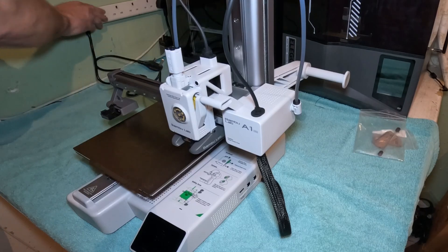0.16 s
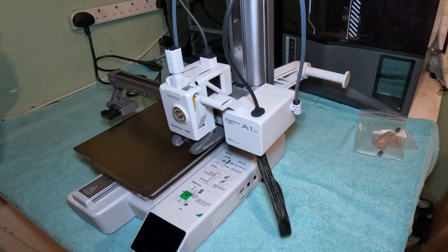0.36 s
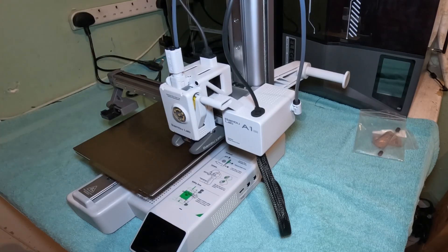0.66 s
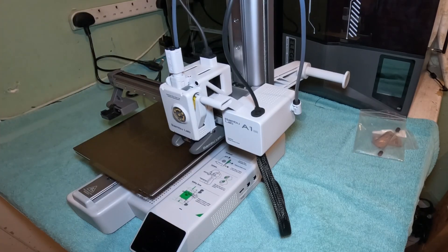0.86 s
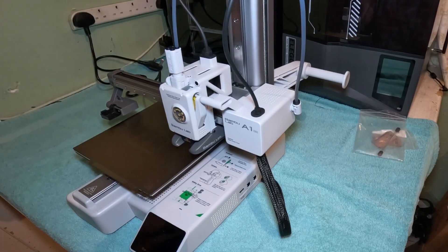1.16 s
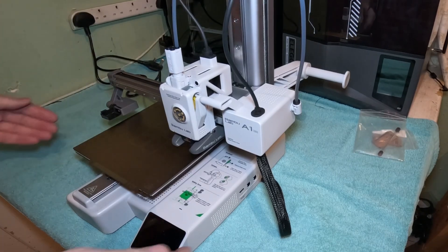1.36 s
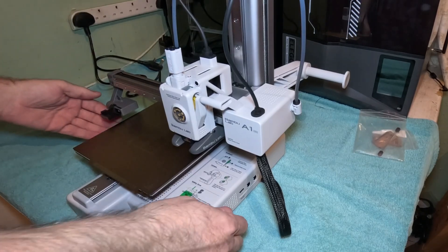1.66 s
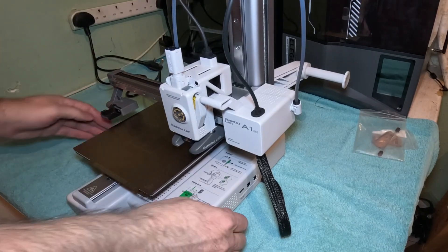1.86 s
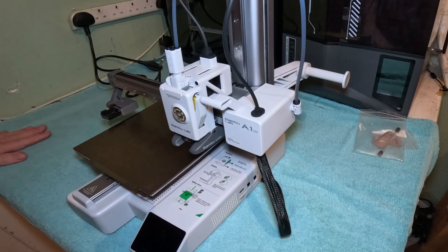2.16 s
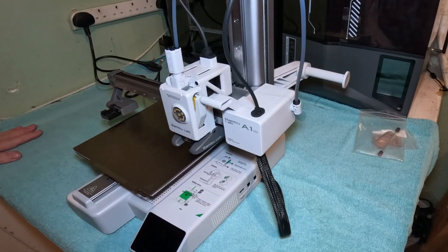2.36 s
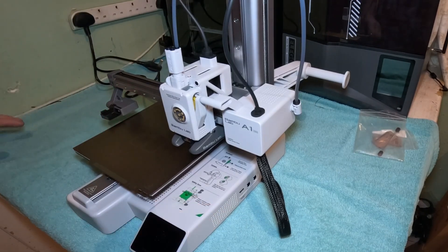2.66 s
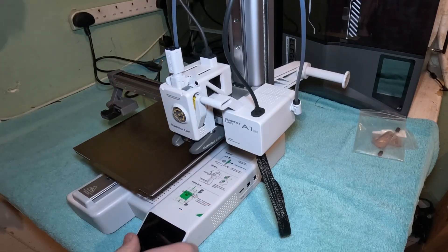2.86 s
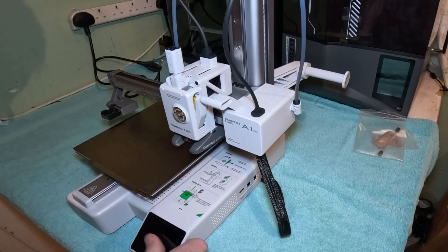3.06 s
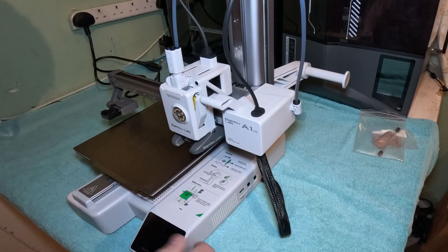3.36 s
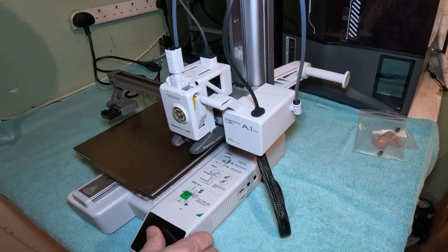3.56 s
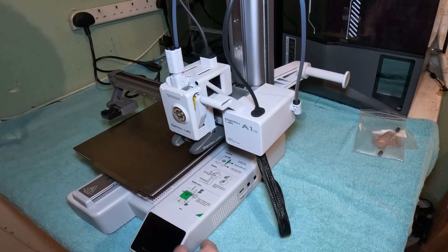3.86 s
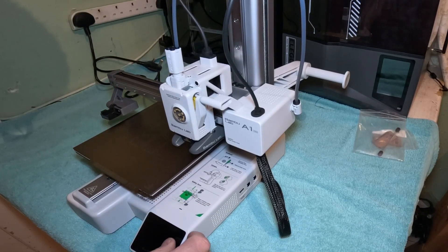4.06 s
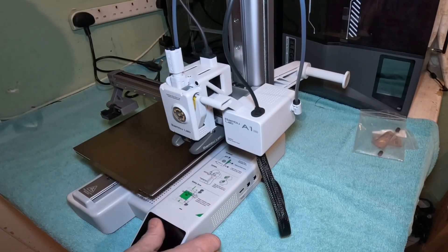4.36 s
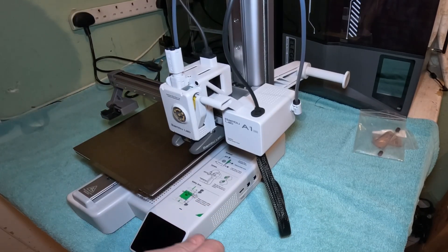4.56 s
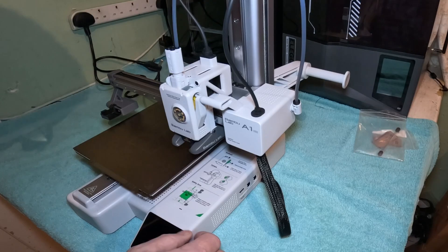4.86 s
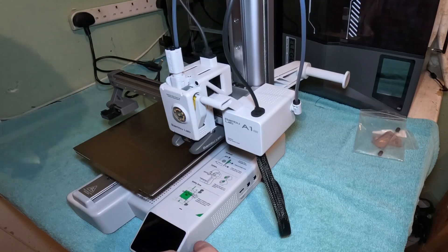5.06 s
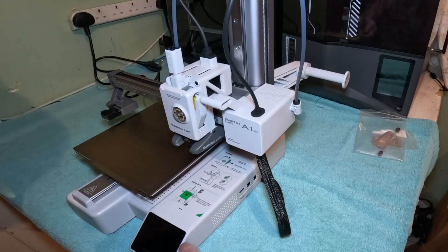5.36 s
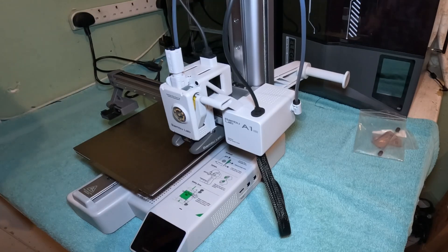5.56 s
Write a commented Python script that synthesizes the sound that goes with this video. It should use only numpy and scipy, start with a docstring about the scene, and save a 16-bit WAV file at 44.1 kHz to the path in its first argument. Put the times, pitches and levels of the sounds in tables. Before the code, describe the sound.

A mains plug snaps sharply into a socket, followed by table knocks, soft cloth rustles and small plastic ticks in a quiet room.

```python
"""A small, quiet workshop room drones faintly. A mains plug snaps into a plastic wall socket,
which rattles while the wall booms. Hands bump the table, making it knock and boom, and brush over
a towel, whose slipping fibres hiss. A cable scrapes along an edge. Fingers rub the plastic
housing of a desktop machine, and its hollow shell hums and ticks under the touch."""
import sys
import numpy as np
from scipy import signal
from scipy.fft import rfft, irfft, next_fast_len
from scipy.io import wavfile
from scipy.ndimage import uniform_filter1d, map_coordinates

SR = 44100
rng = np.random.default_rng(int(sys.argv[2]) if len(sys.argv) > 2 else 0)


def master_out(mix):
    """Clip the mix to full scale and print it as 16-bit PCM to the path in sys.argv[1]."""
    frames = np.transpose(np.atleast_2d(mix))
    ceiling = np.clip(frames, -1, 1)
    pcm = np.round(ceiling * 32767).astype(np.int16)
    wavfile.write(sys.argv[1], SR, pcm)


N = 251644

# A fade_s is the time to fall 60 dB, a rise_s the time to climb 20 dB. Positive pan_db means left.
# the plug's two hits: start_s, level_db, fade_s
PLUG_HITS = [(.0004, -11.5, 0.025), (.0032, -15, 0.011)]
# tone of the socket's rattle, the wall's answer and the room's drone: pitch_hz, level_db
SOCKET_TONE = [(180, -49.5), (300, -15.5), (892, -21.5), (2100, -3), (3400, -9), (5300, 3.5), (7880, -12),
               (12300, -21.5), (15500, -43)]
WALL_TONE = [(35, -58.5), (60, -35), (183, -4), (259, -16), (642, -9), (810, -19), (1260, -10.5),
             (1740, -15), (1910, -8), (2650, -18.5), (3670, -11), (9510, -23), (15500, -55)]
DRONE_TONE = [(41, -37.5), (70, -13.5), (123, -15), (154, 2), (212, -1.5), (304, -9.5), (364, -12),
              (560, -18.5), (920, -25.5), (984, -22.5), (1180, -18.5), (3730, -36.5), (7030, -33.5),
              (15500, -57)]
# how loud the drone is: time_s, level_db
DRONE_LEVEL = [(0.3, -61), (0.57, -64.5), (1.07, -60), (1.59, -61.5), (5.01, -62), (5.55, -59.5),
               (5.71, -58.5)]
# where the drone sits: pitch_hz, pan_db
DRONE_PAN = [(60, -1.5), (240, -2.5), (950, -7), (3770, 2), (15000, 4.5)]
# jolts of the table: full_at_s, level_db
TABLE_JOLTS = [(.11, -50), (.9, -61), (1.53, -61), (2.12, -67), (2.5, -70), (3.13, -61), (3.7, -63),
               (4.2, -72), (4.62, -66), (5.1, -63), (5.55, -70)]
# bumps on the table: start_s, knock_db, boom_over_knock_db, boom_hz, clack_over_knock_db
TABLE_BUMPS = [(.148, -46, -12, 323, 1), (.242, -55, -2, 240, -15), (.849, -72, 13, 240, -26),
               (1.057, -28, -16.5, 187, -25), (1.286, -50.5, 0, 220, -31), (1.51, -58, 6, 300, -20),
               (2.225, -65, 10, 170, -12), (2.521, -52, 12, 195, -20), (4.03, -75, 14, 300, -26),
               (5.0, -70.5, 13, 300, -17.5), (5.534, -40.5, -8, 300, -11), (5.634, -63, 8.5, 270, -28)]
# how the table's board knocks and its top booms: pitch_hz, width_hz, level_db
KNOCK_RINGS = [(500, 270, 3.5), (620, 120, 7.5), (972, 410, 4), (1350, 1030, -10.5)]
BOOM_RINGS = [(173, 27, -1.5), (248, 27.5, -2.5), (300, 195, -5)]
# the hands move from the left to the front and back: time_s, pan_db
HAND_PAN = [(0, 3.5), (1.9, 3), (2.2, 1.3), (3, 0.5), (5.3, 1), (5.6, 3)]
# skin on cloth, and (at 1.058 s) the short hiss of the loudest table knock:
# full_at_s, rise_s, hold_s, hiss_db, drift_db, dull_over_hiss_db, fine_over_hiss_db
HISSES = [(.228, .018, .005, -67.5, 0, 12.5, -23), (.392, .04, .005, -63, 0, 6.5, -21),
          (.61, .16, .2, -69, -9, 2.5, -8), (1.04, .5, .02, -71, 0, 6, -4),
          (1.058, .005, .05, -60, -13, 3, -19), (1.2, .1, .3, -82, -2, -2, -2),
          (1.56, .15, .18, -85, 1, 12, -5), (1.79, .06, .12, -74, -3, 8, -13),
          (1.942, .05, .003, -72.5, 0, -2, -5), (2.205, .036, .15, -53.5, 0, -2.5, -6),
          (2.47, .06, .05, -55, 3, -3, -9), (2.53, .03, .11, -52, -11, -6, -8),
          (3.036, .05, .1, -68, -1, .5, -4), (3.188, .12, .13, -63.5, 1.5, 1.5, -5),
          (3.315, .03, .11, -65, -14, 1, -4), (3.556, .08, .13, -79, 1, 3.5, -2),
          (3.758, .075, .025, -57, -4, -1.5, -2), (3.8, .03, .11, -63, -8, -1.5, -14),
          (4.08, .01, .005, -82, 0, 5.5, -2), (4.356, .13, .07, -74, -6, -.5, -4),
          (4.49, .11, .005, -73, 0, 7.5, -2), (4.595, .02, .065, -70, 5, -1.5, 1),
          (4.82, .05, .02, -84, 0, 2.5, -2), (4.93, .015, .005, -76, 0, -1.5, 5),
          (5.011, .09, .005, -64.5, 0, 4.5, -8)]
# their main hiss, dull body and fine top: pitch_hz, level_db
HISS_TONE = [(1470, -36), (2500, -7), (3260, -5.5), (5800, 1.5), (7530, 0.5), (10000, -10), (13000, -36.5),
             (22000, -120)]
DULL_TONE = [(500, -29.5), (1000, -1), (2000, -1.5), (3500, -6.5), (6000, -11.5), (10000, -40)]
FINE_TONE = [(7500, -30), (9300, 2), (10300, -6.5), (11500, -10.5), (14500, -19), (15700, -27)]
# ticks of the plastic: start_s, ring_db, pitch_hz, crack_over_ring_db, fade_s
PLASTIC_TICKS = [(.223, -51, 1080, -1, .03), (.479, -54.5, 2380, -17, .045), (2.79, -64, 1050, 3.5, .021),
                 (3.003, -52.5, 1397, -15, .027), (3.094, -37, 1015, -6, .02), (3.137, -34, 890, -26, .011),
                 (3.152, -41, 1410, -7, .052), (3.311, -41.5, 974, -2, .075),
                 (3.475, -50.5, 1370, -12, .024), (3.65, -48, 966, -7, .019), (3.692, -54, 620, -16, .079),
                 (3.757, -50, 980, -17, .082), (3.761, -48.5, 530, -25, .088), (3.8, -47.5, 1450, 1, .026),
                 (4.078, -53, 1383, -10, .036), (4.477, -54, 1400, -10, .03),
                 (4.592, -49.5, 1033, -10, .041), (4.668, -54, 2600, .5, .022),
                 (4.921, -46, 1430, -6, .027), (5.017, -40.5, 975, -6, .021)]
# how loud the cable scrapes: time_s, level_db
SCRAPE_LEVEL = [(0.68, -84), (0.706, -69), (1.024, -66), (1.05, -67.5)]
# how the edge, upper shell, lower shell and base plate ring: pitch_hz, width_hz, level_db
EDGE_RINGS = [(1218, 200, -4), (1990, 150, 1.5), (2700, 320, -9.5)]
UPPER_RINGS = [(1410, 200, 5), (1740, 150, -12.5)]
LOWER_RINGS = [(651.8, 120, -3.5), (926, 380, 4)]
BASE_RINGS = [(312, 41, 1), (540, 140, -1)]
# fingers on the housing: full_at_s, rise_s, hold_s, upper_db, lower_db, base_db
FINGER_RUBS = [(3.004, .006, .06, -61, -74, -73), (3.07, .04, .025, -65, -62, -72),
               (3.145, .006, .02, -52, -53, -60), (3.22, .12, .065, -66, -56, -71),
               (3.318, .07, .005, -55, -54, -69), (3.57, .1, .03, -63, -81, -81),
               (3.7, .03, .025, -69, -66, -65), (3.77, .05, .01, -63, -54, -57),
               (3.81, .05, .003, -55, -64, -78), (4.079, .006, .01, -67, -77, -78),
               (4.34, .2, .03, -65, -74, -80), (4.485, .05, .015, -57, -75, -75),
               (4.594, .02, .09, -65.5, -70, -72), (4.82, .07, .02, -65.5, -83, -88),
               (4.925, .01, .05, -61, -76, -76), (5.0, .08, .02, -52, -57, -61)]
# the room's echo, before each sound shortens it: pitch_hz, fade_s
ROOM_FADE = [(120, 0.35), (500, 0.33), (1500, 0.27), (4000, .26), (12000, 0.21)]
# how alike left and right are in close sounds, drone and echoes: pitch_hz, likeness (0 to 1)
CLOSE_LIKENESS = [(300, 1), (2000, 0.3), (4000, 0.9), (9000, .88), (13000, 0)]
DRONE_LIKENESS = [(60, 0.79), (240, 0.56), (950, 0.19), (3770, 0.36), (15000, 0.45)]
ECHO_LIKENESS = [(250, 0.99), (700, 0.9), (1500, 1), (3500, .5), (7000, 0.8), (13000, .08)]
# the microphone's two openings: pitch_hz, pan_db, left_lead_rad
MIC_PORTS = [(300, -3, 0.27), (1200, 0, -.25), (3500, 0, -0.82), (8000, 0.5, -.15), (10500, 0.5, 0),
             (13000, 3, 0)]


def amp(db):
    """Turn decibels into a gain."""
    return 10 ** (np.asarray(db) / 20)


def unit(x):
    """Scale x to an average strength (rms) of 1."""
    return x / np.sqrt(np.mean(x ** 2) + 1e-20)


def peak(x):
    """Scale x to a peak of 1."""
    return x / np.max(np.abs(x))


def along(points, hz):
    """Read a (pitch_hz, value) table at any pitch."""
    pitches, values = np.transpose(points)
    return np.interp(np.log(hz + 1), np.log(pitches + 1), values)


def curve(points):
    """Read a (time_s, value) table at every sample."""
    return np.interp(np.arange(N) / SR, *np.transpose(points))


def wobble(rate_hz):
    """A smooth curve through rate_hz random values a second."""
    values = rng.standard_normal(int(N * rate_hz / SR) + 4)
    return map_coordinates(values, [np.arange(N) * rate_hz / SR])


def swell(full_at_s, rise_s, hold_s, fall_db_per_s, drift_db=0):
    """A level in dB that rises to 0, holds with a drift, then falls."""
    t = np.arange(N) / SR - full_at_s
    held = np.clip(t, 0, hold_s)
    rise_db = 20 * np.minimum(t, 0) / rise_s
    return rise_db + drift_db * held / hold_s - fall_db_per_s * np.maximum(t - held, 0)


def filtered(x, response):
    """Shape x by response(hz), a gain and phase for each pitch."""
    n = x.shape[-1]
    size = next_fast_len(n + 8192)
    return irfft(rfft(x, size) * response(np.fft.rfftfreq(size, 1 / SR)), size)[..., :n]


def rings(table):
    """The response of a thing that rings at (pitch_hz, width_hz, level_db) rows."""
    return lambda f: sum((-1) ** k * amp(db) * 1j * f * width / (hz * hz - f * f + 1j * f * width)
                         for k, (hz, width, db) in enumerate(table))


def band(hz, width_hz):
    """The response of a single ring."""
    return rings([(hz, width_hz, 0)])


def click(tone):
    """A click of energy 1 with the given tone."""
    cepstrum = irfft(np.log(amp(along(tone, np.fft.rfftfreq(4096, 1 / SR))) + 1e-6))
    cepstrum[1:2048] *= 2  # folding it forward leaves no sound before the blow
    cepstrum[2049:] = 0
    pulse = irfft(np.exp(rfft(cepstrum)))
    return pulse / np.linalg.norm(pulse)


def pan(x, pan_db):
    """Make the left side pan_db louder than the right."""
    return x * amp(np.multiply.outer([.5, -.5], pan_db * np.ones(x.shape[-1])))


def noise(likeness):
    """White stereo noise whose sides are as alike as the table says."""
    turn = lambda hz: np.arccos(np.clip(along(likeness, hz), -1, 1)) / 2
    shares = lambda hz: np.array([np.cos(turn(hz)), np.sin(turn(hz))])
    mid, side = filtered(rng.standard_normal((2, N)), shares)
    return np.array([mid + side, mid - side])


def patchy(x, depth_db):
    """Vary the strength of x in small patches of time and pitch."""
    cells = signal.stft(x, nperseg=512)[2]
    patches = uniform_filter1d(rng.standard_normal(cells.shape[1:]), size=5, axis=0)
    patches = uniform_filter1d(patches, size=6, axis=1)
    return signal.istft(cells * amp(depth_db * unit(patches)), nperseg=512)[1][:, :N]


def echoes(x, shorten):
    """The room's answer to a short sound: high pitches die sooner."""
    hz, t, cells = signal.stft(rng.standard_normal((2, SR // 2)), SR, nperseg=256)
    turn = np.arccos(np.clip(along(ECHO_LIKENESS, hz), 0, 1))[:, None] / 2
    mid, side = np.cos(turn) * cells[0], np.sin(turn) * cells[1]
    fade = amp(-60 * t / (shorten * along(ROOM_FADE, hz)[:, None]))
    tail = signal.istft(fade * np.array([mid + side, mid - side]), SR, nperseg=256)[1]
    delay = round(0.0028 * SR)  # to the first wall and back
    tail = np.pad(tail, ((0, 0), (delay, 0))) / np.linalg.norm(tail[0])
    return signal.fftconvolve(x[None], tail, axes=1)[:, :SR // 2]


def roomy(x, echo_db, shorten):
    """A short sound with its echoes."""
    return np.pad(x, (0, SR // 2 - len(x))) + amp(echo_db) * echoes(x, shorten)


def add(out, start_s, x):
    """Mix x into out from start_s on."""
    part = out[:, round(start_s * SR):][:, :x.shape[1]]
    part += x[:, :part.shape[1]]


def plug_snap():
    """The pins slam home, the socket rattles briefly and the wall passes the blow to the room."""
    out, t, rattle = np.zeros((2, N)), np.arange(SR // 20) / SR, 0
    for start_s, db, fade_s in PLUG_HITS:
        fade = (t > start_s) * amp(db - 60 * np.abs(t - start_s) / fade_s)
        rattle = rattle + fade * noise(CLOSE_LIKENESS)[:, :len(t)]
    add(out, 0, signal.fftconvolve(rattle, click(SOCKET_TONE)[None], axes=1))
    wall = filtered(click(WALL_TONE), lambda f: 1 + 0.77 * band(188, 25)(f))  # the hollow wall box booms
    add(out, 0, amp(7) * echoes(wall, shorten=0.89))
    return pan(out, 1.9)


def room_drone():
    """The room's faint hush, with a low hum that wavers."""
    tone = lambda hz: pan(amp(along(DRONE_TONE, hz)), along(DRONE_PAN, hz))
    hush = unit(filtered(patchy(noise(DRONE_LIKENESS), depth_db=1.5), tone))
    hum = filtered(hush, lambda hz: 1 / (1 + (hz / 400) ** 4))
    wavering_hum = amp(-3 + 1.5 * wobble(13)) * hum
    return amp(curve(DRONE_LEVEL)) * (hush - hum + wavering_hum)


def table_rumble():
    """A very deep sway that swells when the table is jolted."""
    sway = unit(filtered(noise([(20, 0.8)]), lambda hz: hz / (hz + 8) / (1 + (hz / 45) ** 3)))
    jolts = sum(amp(db + swell(full_at_s, rise_s=.17, hold_s=.02, fall_db_per_s=85))
                for full_at_s, db in TABLE_JOLTS)
    return (amp(-79) + jolts) * sway  # a little sway remains at rest


def table_bumps():
    """A blow sets the board chattering: it knocks, clacks at its edge and booms near one pitch."""
    out, t = np.zeros((2, N)), np.arange(SR // 3) / SR
    fade_s = .165
    for start_s, db, boom_db, boom_hz, clack_db in TABLE_BUMPS:
        chatter = (t == 0) + 0.046 * amp(-60 * t / fade_s) * rng.standard_normal(len(t))
        knock = filtered(chatter, lambda f: rings(KNOCK_RINGS)(f) / (1 + 1j * f / 1800) ** 2)
        clack = filtered(chatter, lambda f: band(1900, 1400)(f) ** 4)
        boom = filtered(chatter, lambda f: rings(BOOM_RINGS)(f) * band(boom_hz, 150)(f) ** 2)
        bump = peak(knock) + amp(clack_db) * peak(clack) + amp(boom_db) * peak(boom)
        add(out, start_s, amp(db) * roomy(bump, echo_db=2, shorten=0.42))
    return pan(out, curve(HAND_PAN))


def towel_and_knock_hiss():
    """Fibres slip under the skin with a grainy hiss that darkens; the loudest knock hisses too."""
    dull_lag_s, dull_grows_db_per_s, fine_fades_db_per_s = .012, 18, 40
    power = 0
    for full_at_s, rise_s, hold_s, db, drift_db, dull_db, fine_db in HISSES:
        since_s = np.clip(np.arange(N) / SR - full_at_s, 0, 1)
        stopped_s = np.maximum(since_s - hold_s, 0)
        hiss_db = db + swell(full_at_s, rise_s, hold_s, fall_db_per_s=240, drift_db=drift_db)
        late_db = 20 * np.minimum(since_s - dull_lag_s, 0) / rise_s
        dull_db += late_db + dull_grows_db_per_s * since_s
        fine_db -= fine_fades_db_per_s * (since_s + 2 * stopped_s)  # faster after the hold
        power = power + amp([hiss_db, hiss_db + dull_db, hiss_db + fine_db]) ** 2
    slips = amp(1.5 * wobble(25) + 1.2 * wobble(400))
    out = 0
    for gain, tone in zip(np.sqrt(power), (HISS_TONE, DULL_TONE, FINE_TONE)):
        grains = slips * patchy(noise(CLOSE_LIKENESS), depth_db=2)
        out = out + gain * unit(filtered(grains, lambda hz: amp(along(tone, hz))))
    return pan(out, curve(HAND_PAN))


def plastic_ticks():
    """Each tick rings one patch of plastic, with a short crack of noise on top."""
    out, t = np.zeros((2, N)), np.arange(SR // 10) / SR
    for start_s, db, hz, crack_db, fade_s in PLASTIC_TICKS:
        onset = 1 - np.exp(-t / 0.00028)
        ring = onset * amp(-60 * t / fade_s) * np.sin(2 * np.pi * hz * t)
        crack_hz = 5500 * 2 ** (crack_db / 15)  # a weaker crack is also duller
        burst = amp(-60 * t / (.8 * fade_s)) * rng.standard_normal(len(t))
        tone = lambda f: band(crack_hz, 1.3 * crack_hz)(f) / (1 + 1j * f / (1.8 * crack_hz)) ** 4
        tick = ring + amp(crack_db) * peak(filtered(burst, tone))
        add(out, start_s, amp(db) * roomy(tick, echo_db=-10.5, shorten=0.27))
    return pan(out, .8)


def cable_scrape():
    """A cable rubs along an edge and makes it ring at a few pitches."""
    rub = filtered(amp(1.6 * wobble(99)) * noise(ECHO_LIKENESS), rings(EDGE_RINGS))
    start_s, end_s = SCRAPE_LEVEL[0][0], SCRAPE_LEVEL[-1][0]
    level_db = curve([(start_s - .004, -120), *SCRAPE_LEVEL, (end_s + .004, -120)])
    return pan(amp(level_db) * unit(rub), 3)


def finger_rubs():
    """Fingertips stick and slip, making the shell and base plate hum."""
    power = sum(amp(np.add.outer(parts_db, swell(full_at_s, rise_s, hold_s, fall_db_per_s=350))) ** 2
                for full_at_s, rise_s, hold_s, *parts_db in FINGER_RUBS)
    upper, lower, base = np.sqrt(power)
    slips = amp(1.1 * wobble(60) + 0.57 * wobble(250))

    def hum(table, hz):
        ringing = filtered(slips * noise(CLOSE_LIKENESS), rings(table))
        return unit(filtered(ringing, band(hz, width_hz=hz)))

    shell = upper * hum(UPPER_RINGS, hz=1450) + lower * hum(LOWER_RINGS, hz=882.7)
    return pan(shell + base * hum(BASE_RINGS, hz=436.6), -0.36)


def scene():
    """All the sounds together."""
    close = plug_snap() + towel_and_knock_hiss() + cable_scrape() + finger_rubs() + plastic_ticks()
    return close + table_bumps() + room_drone() + table_rumble()


def record(dry):
    """The microphone's two openings differ a little in level and phase; the highest treble is cut."""
    top_hz = 15700
    pitches, pan_db, lead_rad = np.transpose(MIC_PORTS)
    split = lambda values, hz: np.multiply.outer([.5, -.5], along(np.transpose([pitches, values]), hz))
    ports = lambda hz: amp(split(pan_db, hz)) * np.exp(1j * split(lead_rad, hz))
    return filtered(dry, lambda hz: ports(hz) * (hz < top_hz))


dry = scene()
out = record(dry)
master_out(out)
```